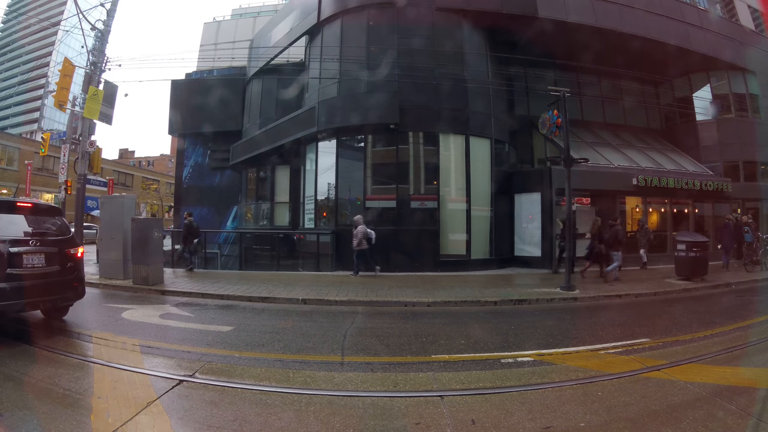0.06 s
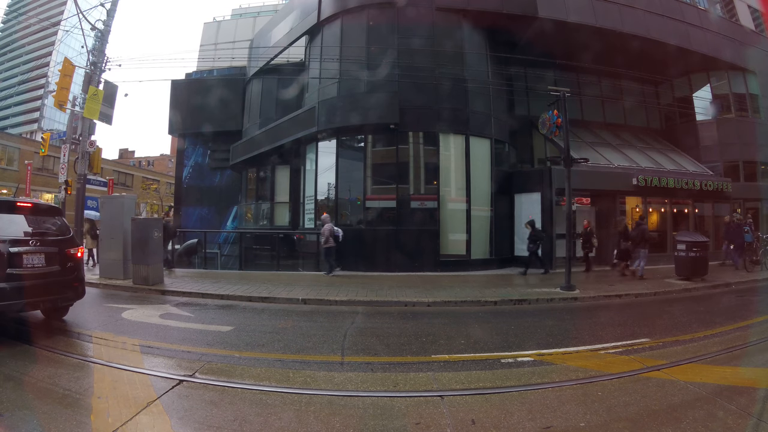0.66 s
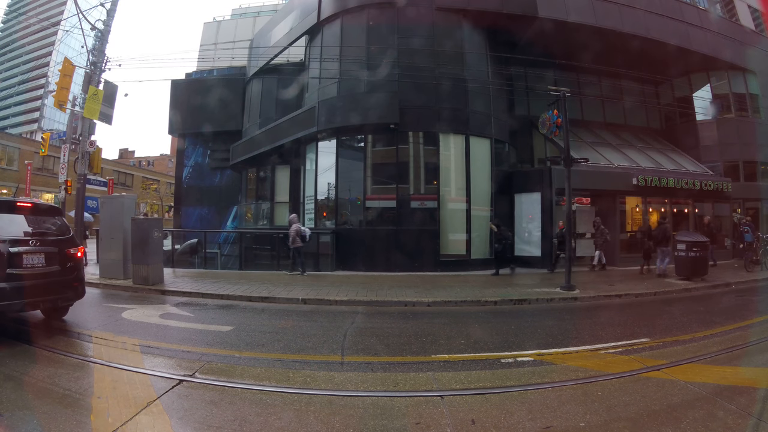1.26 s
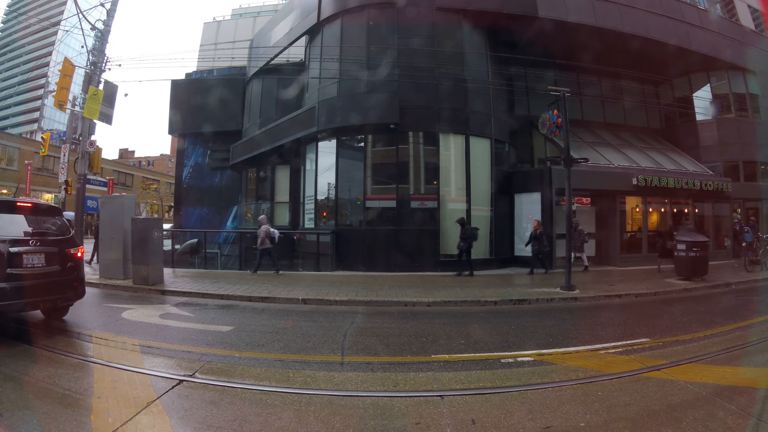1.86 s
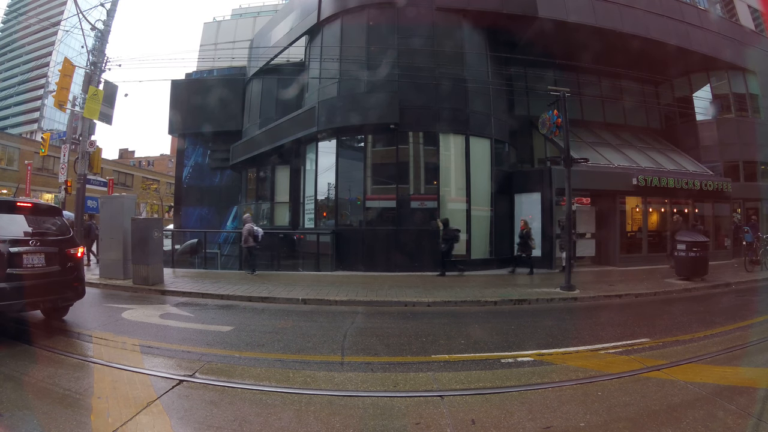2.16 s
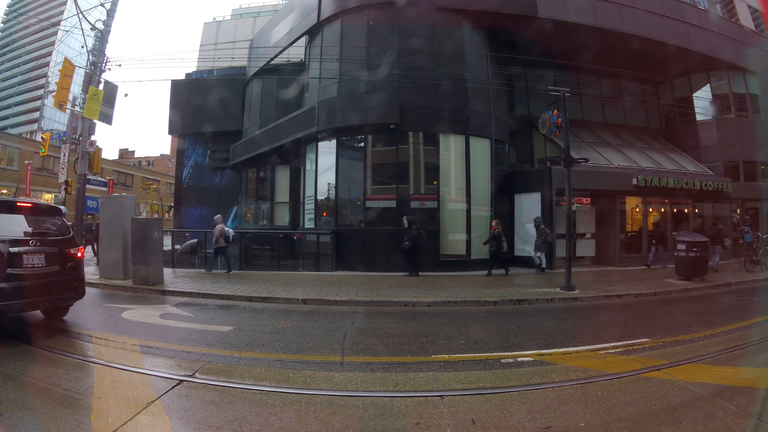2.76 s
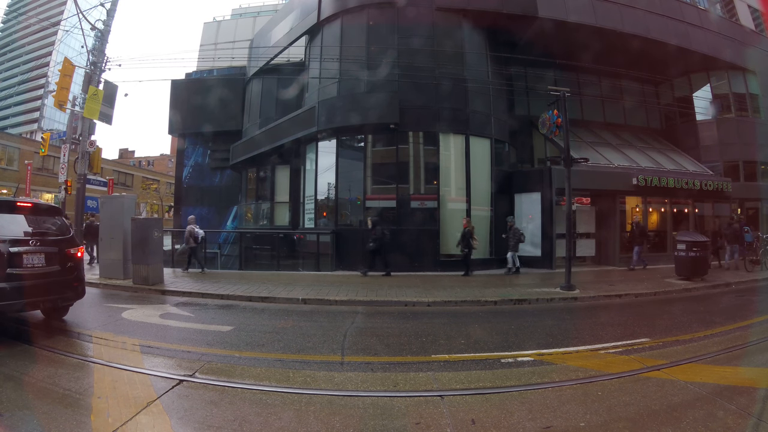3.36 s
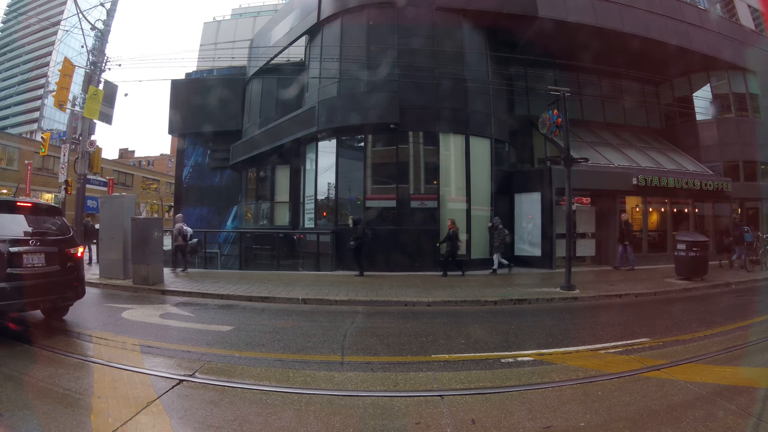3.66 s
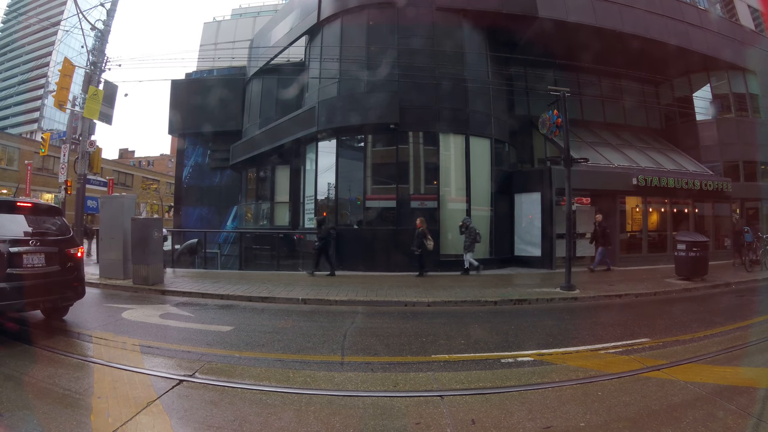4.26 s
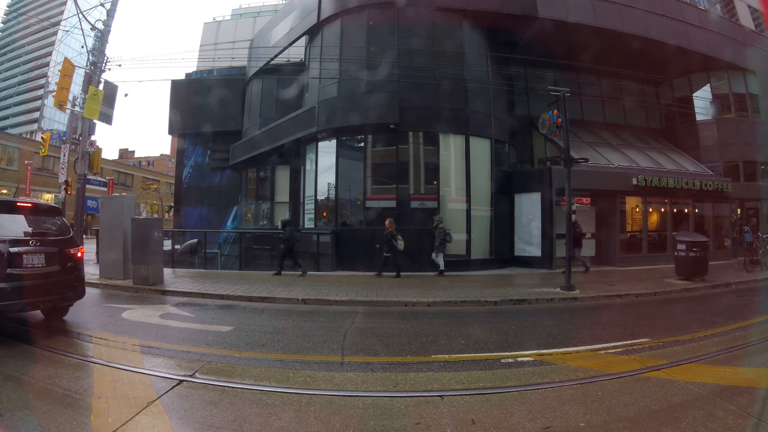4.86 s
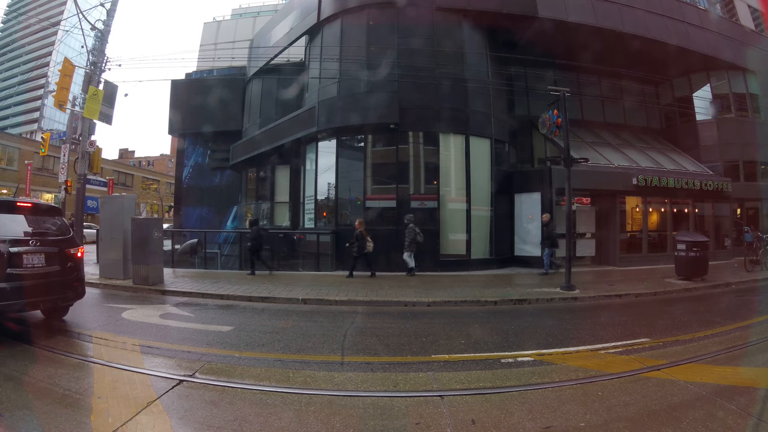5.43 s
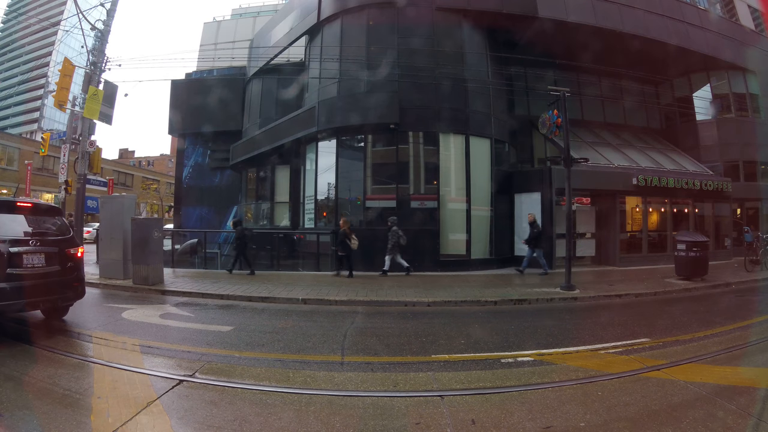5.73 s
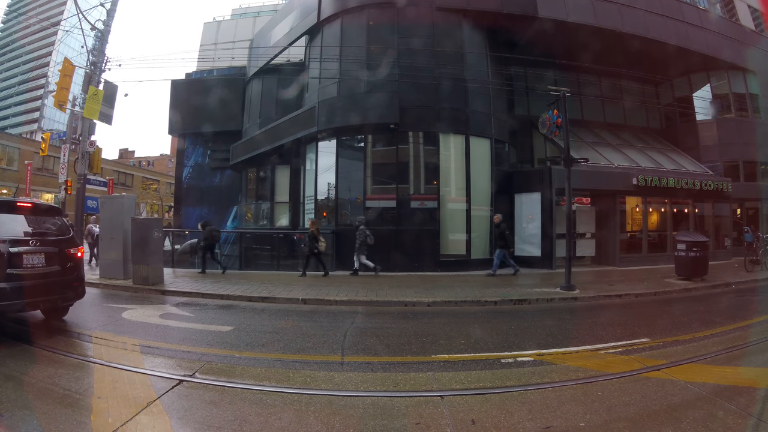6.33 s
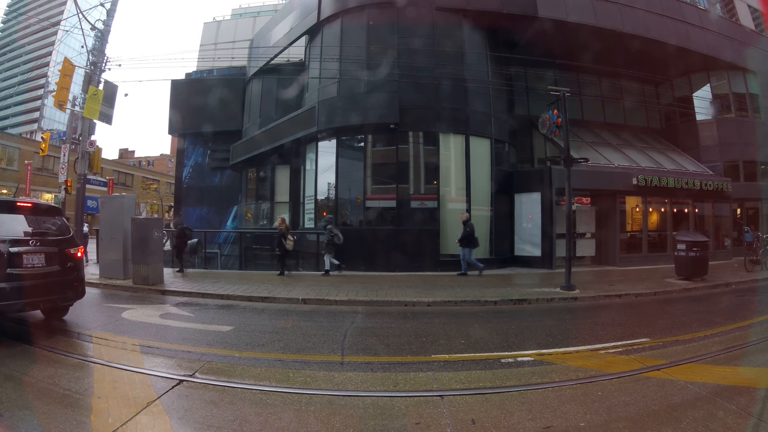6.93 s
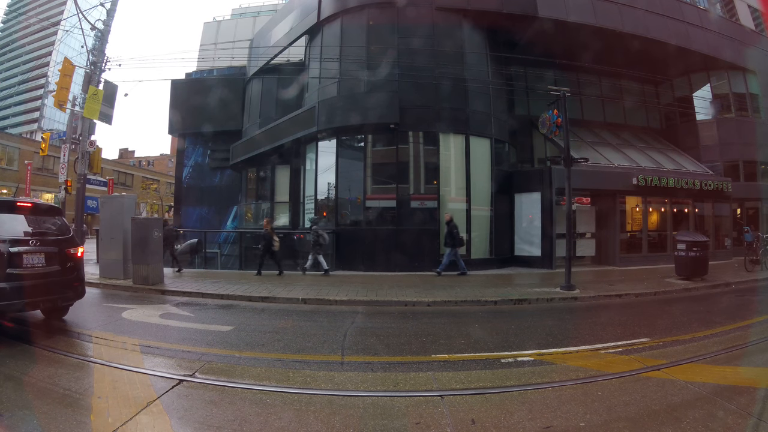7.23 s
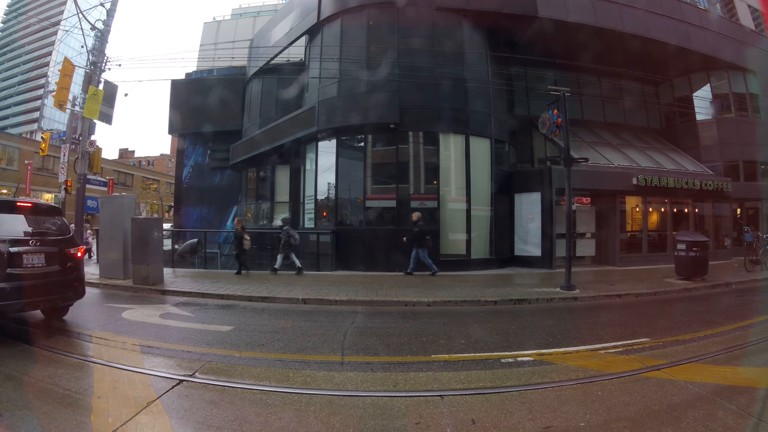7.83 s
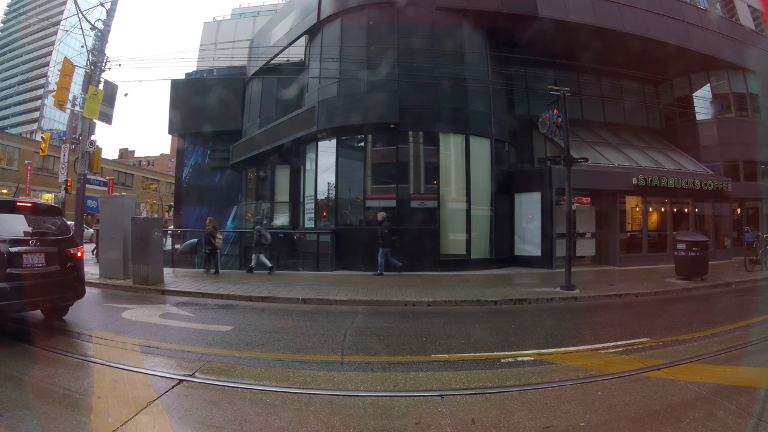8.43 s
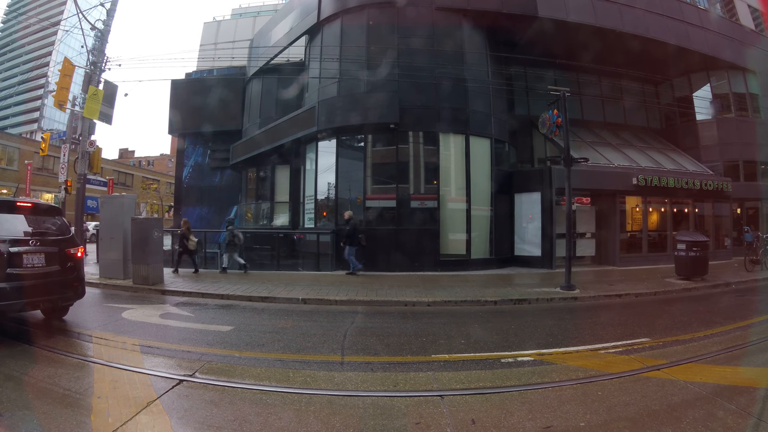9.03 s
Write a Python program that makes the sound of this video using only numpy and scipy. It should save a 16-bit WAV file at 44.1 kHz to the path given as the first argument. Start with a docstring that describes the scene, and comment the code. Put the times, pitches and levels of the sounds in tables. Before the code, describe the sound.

A low machinery drone and airy ventilation fill a stationary streetcar, heard from inside through a small, slightly boxy microphone. Deep traffic rumble fades early and returns past the middle. Dull panel thumps come in a cluster near the start and again as the traffic swells. Between them, loose metal fittings clack, trim squeaks briefly and something brushes by. A last soft thud and brush come near the end.

```python
"""Inside a streetcar standing at a junction. Throughout: equipment drone, vent hiss, faint motor whine.
0-2 s: traffic rumble ebbs; blows ring the wall panels and shake the loose metal fittings.
2-5 s: fittings clack, trim squeaks by stick-slip, something brushes by, two more thuds.
5-9 s: traffic swells under further thuds and clacks, then ebbs; a last thud, a last brush.
The resonances of a small camera housing colour it all."""
import sys
import numpy as np
from scipy import signal
from scipy.fft import rfft, irfft, next_fast_len
from scipy.io import wavfile

SR = 44100
rng = np.random.default_rng(int(sys.argv[2]) if len(sys.argv) > 2 else 0)


def materialize(psi):
    """Save the field psi as 16-bit PCM at rate SR to the path in sys.argv[1].

    A 1-D psi becomes a single channel; in a 2-D psi each row is a channel.
    """
    bounded = np.clip(np.atleast_2d(psi).T, -1, 1)
    quanta = np.round(bounded * 32767).astype(np.int16)
    wavfile.write(sys.argv[1], SR, quanta)


N = 400869
TIME_S = np.arange(N) / SR

# equipment drone spectrum: (frequency [Hz], gain [dB])
DRONE_SPECTRUM = [(60, -56), (103, -11), (119, -1.5), (138, -1.5), (151, 2), (165, -4.5), (185, 0),
                  (235, -1.5), (263, -7.5), (283, -4.5), (310, -13), (333, -13.5), (355, -16.5), (405, -21),
                  (470, -20.5), (620, -34.5), (1500, -63)]
# traffic swell: (time [s], relative level [dB])
TRAFFIC_SWELL = [(0.15, -21), (1.1, -29.5), (2.4, -32.5), (3.8, -37), (4.7, -30), (5.8, -25), (7.1, -25),
                 (9.0, -32.5)]
# traffic spectrum: (frequency [Hz], gain [dB])
TRAFFIC_SPECTRUM = [(5, -32), (16, -21), (29, -5), (38, 1), (46, -4), (57, -5.5), (85, -9.5), (100, -10.5),
                    (150, -26), (300, -63.5)]
# blows on the panel: (time [s], peak [dB], drive centre [Hz])
PANEL_BLOWS = [(0.497, -21, 424), (.733, -10, 197), (0.753, -15.5, 430), (0.781, -13.5, 284),
               (1.408, -20, 480), (1.569, -12.5, 193), (1.958, -29.5, 520), (1.979, -12, 160),
               (3.754, -22.5, 402), (3.97, -14, 383), (5.408, -10.5, 197), (5.603, -14, 235),
               (6.117, -11, 202), (8.046, -22.5, 365)]
# wall panel modes: (frequency [Hz], gain [dB], t60 [s])
PANEL_MODES = [(180, 6, 0.11), (213, -1.5, 0.24), (248.2, -1.5, 0.16), (280.7, -0.5, 0.2),
               (346, -2.5, 0.11), (514, -10.5, 0.094), (569, -11.5, 0.13)]
# sharp clacks of loose fittings, some landing with a blow:
# (time [s], relative level [dB], centre [Hz], spread [oct])
FITTING_CLACKS = [(0.75, -33.5, 2050, 0.1), (1.414, -38, 3800, 0.7), (2.162, -34.5, 2800, 0.52),
                  (2.172, -40.5, 8800, 0.15), (2.239, -29, 3200, 0.63), (2.258, -33, 6400, 0.58),
                  (2.315, -36.5, 6850, .35), (2.581, -46, 7300, 0.43), (2.677, -37.5, 1700, 1.3),
                  (3.565, -31.5, 3700, 0.54), (3.567, -33, 4380, 0.045), (4.887, -37, 1700, 0.88),
                  (5.585, -34.5, 850, 0.43), (5.782, -40.5, 3500, 0.54), (6.123, -39, 1900, 0.64),
                  (6.816, -38, 1900, 0.7)]
# metal fitting modes: (frequency [Hz], gain [dB], t60 [s])
FITTING_MODES = [(530, 7.5, 0.056), (820, 3, 0.16), (1056, 6, 0.089), (1267, 4, 0.034), (1967, 2, 0.075),
                 (2410, 0.5, 0.027), (3030, -0.5, 0.034), (4470, -5, 0.065), (5080, -3, 0.042),
                 (6540, 3.5, 0.066), (8500, -8, 0.088), (9500, -12, .06)]
# motor and fan tones: (frequency [Hz], level [dB], rms waver [Hz])
MOTOR_TONES = [(147.4, -35, 1.993), (156.2, -34.5, 1.9), (172.9, -34.8, 1.004), (671.8, -58, 0.33)]
# ventilation spectrum: (frequency [Hz], gain [dB])
VENT_SPECTRUM = [(150, 5.5), (450, 1.5), (800, 1.54), (1400, -0.35), (2300, -1), (3300, -7.5), (4900, -9),
                 (6500, -13), (9000, -12.5), (12000, -20), (15000, -28)]
# brush strokes: (time [s], length [s], relative level [dB], centre [Hz], spread [oct])
BRUSH_STROKES = [(3.332, 0.11, -46.5, 4800, 0.4), (3.708, 0.23, -43, 3970, 0.47),
                 (4.105, 0.067, -36, 2460, 1), (4.509, 0.19, -44.5, 5140, 0.25), (5.29, 0.11, -38, 1190, 1),
                 (6.952, .32, -52, 6360, 0.25), (8.78, 0.17, -46, 2220, .15)]
# trim squeaks: (time [s], peak [dB], start pitch [Hz])
TRIM_SQUEAKS = [(.13, -51, 9050), (3.049, -32.5, 2820), (3.252, -41, 2300), (3.261, -37, 2800)]
# treble loss of soft contacts: (frequency [Hz], gain [dB])
SOFT_ROLLOFF = [(9300, 0), (11500, -13)]
# housing response: (frequency [Hz], gain [dB])
HOUSING_RESPONSE = [(1700, 0), (2330, 3.5), (2750, -3.5), (3300, -9.5), (4100, -10.5), (4550, -3),
                    (4900, 3), (5300, -3.5), (5900, -14.5), (6620, -3.5), (7100, -9), (9000, -11),
                    (11500, -14), (15000, -16.5)]


def amp(db):
    """Decibels to gain."""
    return 10 ** (np.asarray(db) / 20)


def unit(x):
    """Scale to rms 1."""
    return x / np.sqrt(np.mean(x ** 2) + 1e-20)


def colour(x, spectrum):
    """Filter by (frequency [Hz], gain [dB]) rows, joined in log frequency."""
    hz, db = np.transpose(spectrum)
    size = next_fast_len(len(x))
    bins_hz = np.fft.rfftfreq(size, 1 / SR)
    gain = amp(np.interp(np.log(bins_hz + 1), np.log(hz), db))
    return irfft(rfft(x, size) * gain, size)[:len(x)]


def bell(hz, centre_hz, spread_oct):
    """Gaussian gain in log frequency."""
    return np.exp(-(np.log2((hz + 1) / centre_hz) / (2 * spread_oct)) ** 2)


def band(x, centre_hz, spread_oct):
    """Bell band-pass, tilted to balance energy per octave."""
    hz = np.fft.rfftfreq(len(x), 1 / SR)
    gain = unit(bell(hz, centre_hz, spread_oct) / np.sqrt(hz + centre_hz / 2))
    return irfft(rfft(x) * gain, len(x))


def drift(rate_hz):
    """Slow random wander, rms 1."""
    knots_s = np.arange(0, TIME_S[-1] + 1, 1 / (2 * rate_hz))
    return unit(np.interp(TIME_S, knots_s, rng.standard_normal(N)[:len(knots_s)]))


def add(mix, at_s, sound):
    """Mix in a sound at at_s."""
    part = mix[max(round(at_s * SR), 0):][:len(sound)]
    part += sound[:len(part)]


def turbulence(spectrum, flutter_db, flutter_hz):
    """Coloured noise with fluttering level, rms 1."""
    noise = unit(colour(rng.standard_normal(N), spectrum))
    return unit(noise * amp(flutter_db * drift(flutter_hz)))


def equipment_drone(swell, level_db=-26.5, follow_db_per_db=0.045):
    """Equipment drones in the car body, gaining slightly as traffic swells."""
    gain = amp(level_db) * unit(swell) ** follow_db_per_db
    return gain * turbulence(DRONE_SPECTRUM, flutter_db=1.65, flutter_hz=8)


def traffic_rumble(swell, gain_db=0.5):
    """Low traffic noise swells and ebbs."""
    return amp(gain_db) * swell * turbulence(TRAFFIC_SPECTRUM, flutter_db=-0.5, flutter_hz=5.9)


def panel_thuds(reach_oct=0.29, rise_s=0.0022):
    """A padded blow rings the panel modes nearest its drive centre."""
    out, t = np.zeros(N), np.arange(SR // 3) / SR
    hz, mode_db, t60_s = np.transpose(PANEL_MODES)[:, :, None]
    attack = 1 - np.exp(-t / rise_s)
    for at_s, peak_db, centre_hz in PANEL_BLOWS:
        modes = amp(mode_db - 60 * t / t60_s) * np.sin(2 * np.pi * (hz * t + rng.random(hz.shape)))
        ring = (bell(hz, centre_hz, reach_oct) * modes).sum(0) * attack
        add(out, at_s, amp(peak_db) * ring / abs(ring).max())
    return out


def rattle_events(hard_hz=447, hard_db=-12.5, db_per_oct=17.5):
    """One rattle per blow, plus the sharp clacks; harder blows are higher and rattle more."""
    shake_s, shake_hz, shake_oct, clack_s = 0.017, 900, 0.87, 0.018
    shaken = [(at_s, shake_s, db + hard_db + db_per_oct * np.log2(hz / hard_hz), shake_hz, shake_oct)
              for at_s, db, hz in PANEL_BLOWS]
    return shaken + [(at_s, clack_s, db, hz, spread_oct) for at_s, db, hz, spread_oct in FITTING_CLACKS]


def fitting_clacks(contacts_per_s=900, scrape_gain=0.93, chatter_t60_s=0.065, rise_s=0.0032):
    """A loose part chatters through a run of tiny contacts that ring its modes."""
    out, t = np.zeros(N), np.arange(8192) / SR
    hz, mode_db, t60_s = np.transpose(FITTING_MODES)[:, :, None]
    hold_ratio, detune_ratio = 0.34, 0.0062
    attack = 1 - np.exp(-t / rise_s)
    for at_s, length_s, db, centre_hz, spread_oct in rattle_events():
        contacts = rng.standard_normal(len(t)) * (rng.random(len(t)) < contacts_per_s / SR)
        scrape = scrape_gain * rng.standard_normal(len(t))
        chatter = unit(band(unit(contacts) + scrape, centre_hz, spread_oct))
        chatter *= amp(-60 * np.maximum(t - length_s, 0) / chatter_t60_s)
        detuned_hz = hz * (1 + detune_ratio * rng.standard_normal(hz.shape))
        modes = np.sin(2 * np.pi * (detuned_hz * t + rng.random(hz.shape)))
        modes *= amp(-60 * np.maximum(t - hold_ratio * length_s, 0) / t60_s)
        weights = amp(mode_db) * bell(hz, centre_hz, spread_oct)
        ring = (weights * modes).sum(0) / np.linalg.norm(weights)
        add(out, at_s, amp(db) * (chatter / np.sqrt(2) + ring) * attack)  # equal power at onset
    return out


def motor_whine(flutter_db=1.14):
    """One tone per rotating part, wavering in pitch and level."""
    out = np.zeros(N)
    for hz, db, waver_hz in MOTOR_TONES:
        cycles = np.cumsum(hz + waver_hz * drift(rate_hz=4)) / SR
        flutter = amp(flutter_db * drift(rate_hz=3))
        out += amp(db) * unit(flutter * np.sin(2 * np.pi * cycles))
    return out


def vent_hiss(start_db=-40.9, hold_s=4.07, fall_db_per_s=0.43):
    """Turbulent vent air holds its level, then eases off."""
    gain = amp(start_db - fall_db_per_s * np.maximum(TIME_S - hold_s, 0))
    return gain * turbulence(VENT_SPECTRUM, flutter_db=1.1, flutter_hz=7)


def brushes():
    """Light friction swells and fades with each stroke."""
    out = np.zeros(N)
    for at_s, length_s, db, centre_hz, spread_oct in BRUSH_STROKES:
        stroke = np.sin(np.linspace(0, np.pi, int(length_s * SR)))
        friction = band(rng.standard_normal(SR), centre_hz, spread_oct)[:len(stroke)]
        add(out, at_s, amp(db) * friction * stroke)
    return out


def trim_squeaks(length_s=0.019, sag_ratio=0.025):
    """Trim sticks and slips: a brief tone, sagging in pitch."""
    out = np.zeros(N)
    for at_s, peak_db, start_hz in TRIM_SQUEAKS:
        hz = start_hz * np.linspace(1, 1 - sag_ratio, int(length_s * SR))
        envelope = np.sin(np.linspace(0, np.pi, len(hz)))
        add(out, at_s, amp(peak_db) * np.sin(2 * np.pi * np.cumsum(hz) / SR) * envelope)
    return out


def trim_ticks(count=55, gain_db=-46, spread_db=2, t60_s=0.19, rise_s=0.0044):
    """Trim ticks faintly at random further down the car."""
    out, t = np.zeros(N), np.arange(SR // 5) / SR
    envelope = (1 - np.exp(-t / rise_s)) * amp(-60 * t / t60_s)
    for when, pitch, size in rng.random((count, 3)):
        tick = band(rng.standard_normal(len(t)), centre_hz=550 * 7 ** pitch, spread_oct=0.48) * envelope
        add(out, when * TIME_S[-1], amp(gain_db + spread_db * (2 * size - 1)) * tick)
    return out


def cabin(x, t60_s=0.15, wet_db=-11, delay_s=0.004):
    """Add dense short reflections off windows and walls."""
    t = np.arange(SR // 2) / SR
    tail = rng.standard_normal(len(t)) * amp(-60 * t / t60_s) * (t > delay_s)
    return x + amp(wet_db) * signal.fftconvolve(x, tail / np.linalg.norm(tail))[:N]


def scene():
    """Machinery, traffic and thuds; only the small noises get cabin reflections."""
    swell = amp(np.interp(TIME_S, *np.transpose(TRAFFIC_SWELL)))
    bed = traffic_rumble(swell) + equipment_drone(swell) + vent_hiss()
    small_noises = colour(fitting_clacks() + brushes(), SOFT_ROLLOFF) + trim_squeaks() + trim_ticks()
    return (bed + motor_whine() + panel_thuds() + cabin(small_noises))[None]


def record(dry):
    """Faint white hiss, housing resonances, low-pass."""
    hiss_db, cutoff_hz = -54.0, 15200
    hiss = amp(hiss_db) * rng.standard_normal(N)
    housed = colour(dry[0] + hiss, HOUSING_RESPONSE)
    lowpass = signal.firwin(511, cutoff_hz, window=("kaiser", 9), fs=SR)
    return signal.oaconvolve(housed, lowpass, "same")[None]


dry = scene()
out = record(dry)
materialize(out)
```